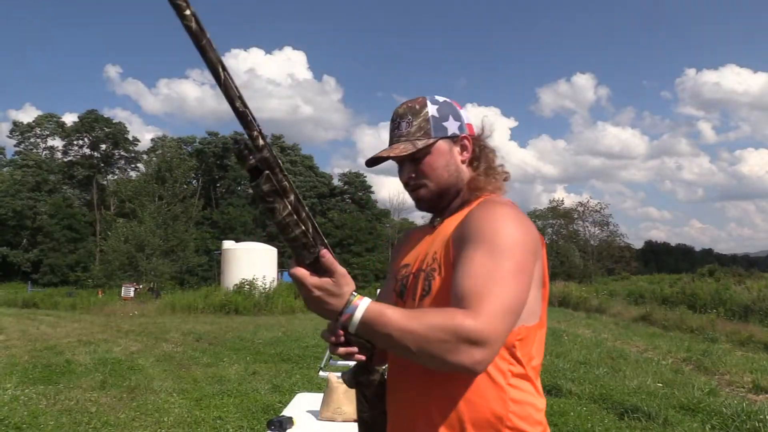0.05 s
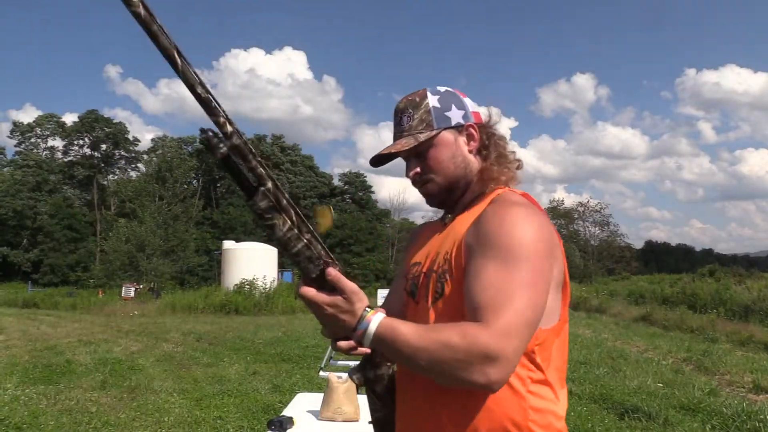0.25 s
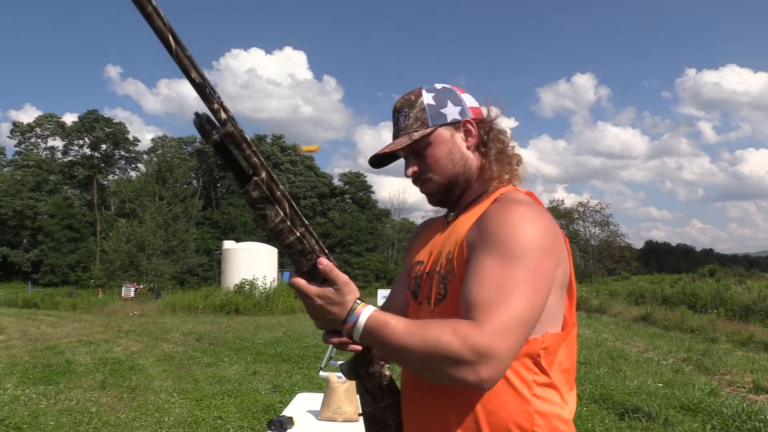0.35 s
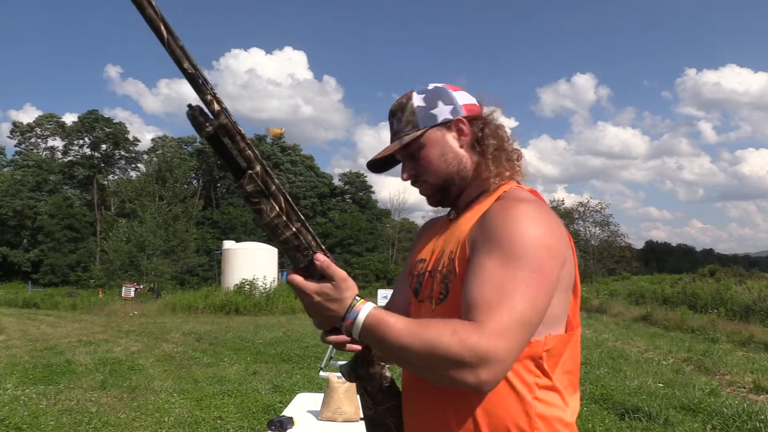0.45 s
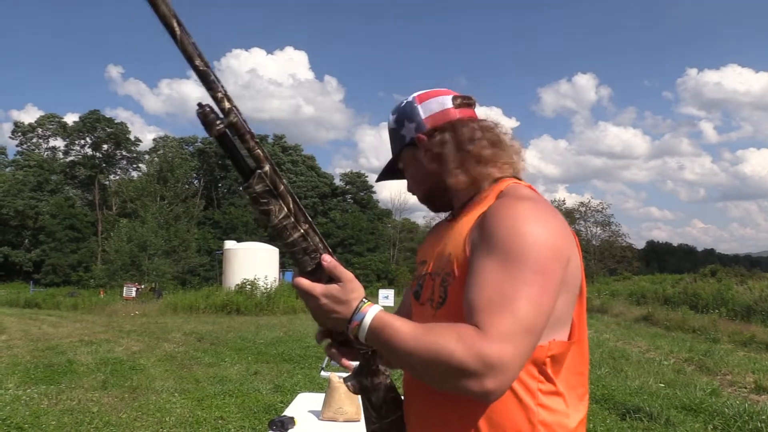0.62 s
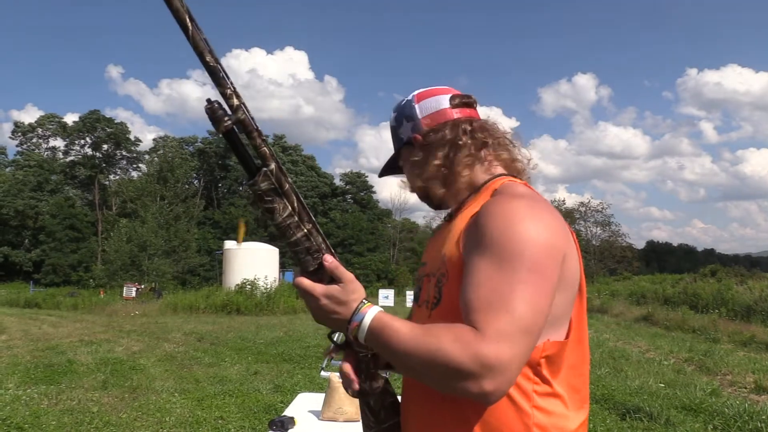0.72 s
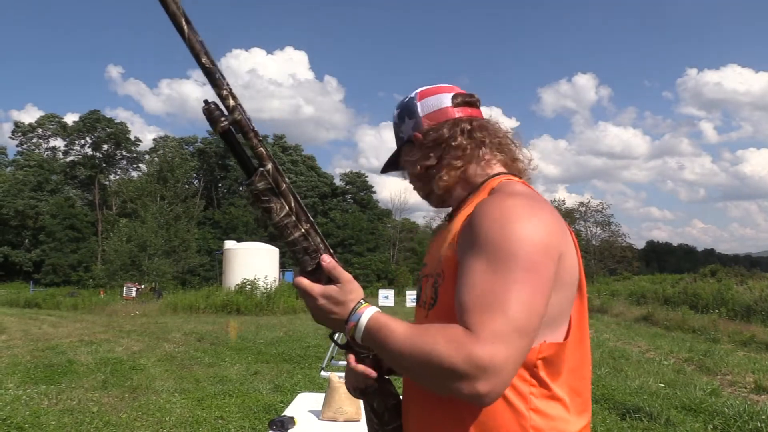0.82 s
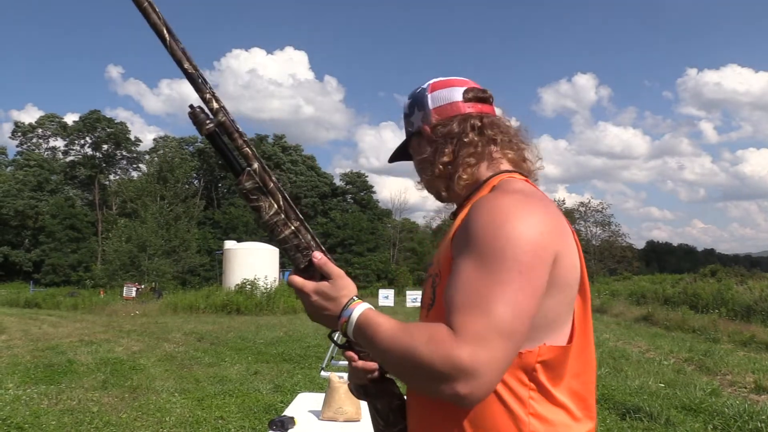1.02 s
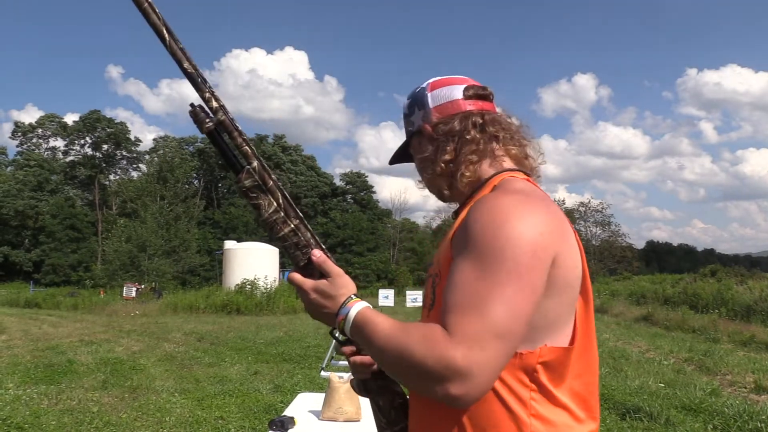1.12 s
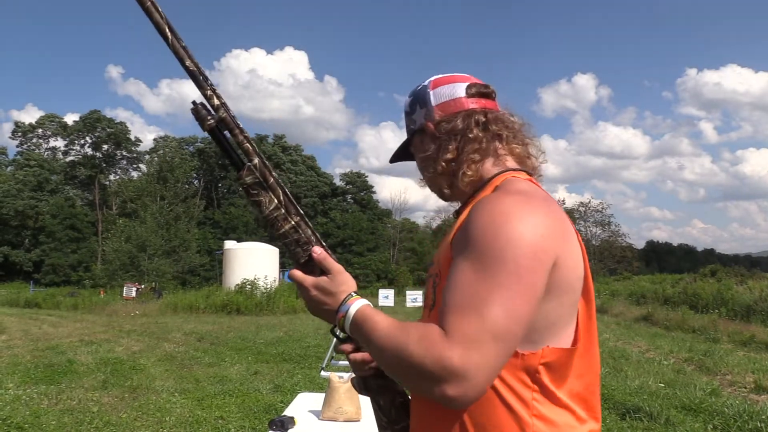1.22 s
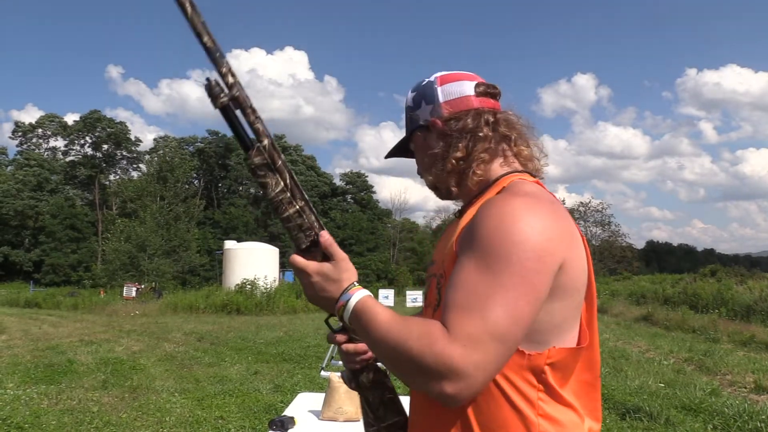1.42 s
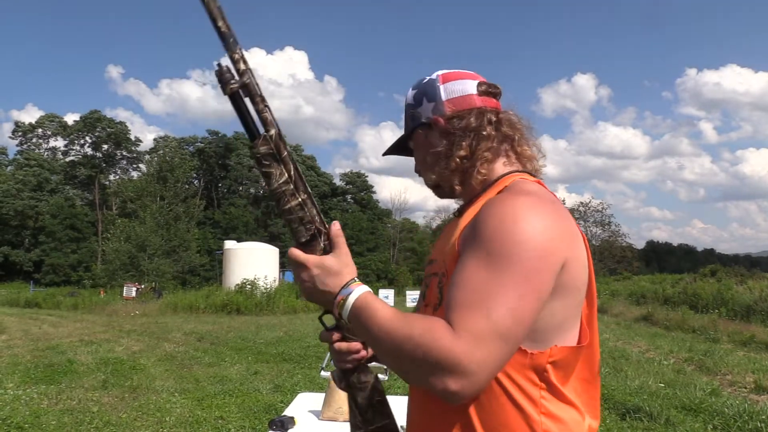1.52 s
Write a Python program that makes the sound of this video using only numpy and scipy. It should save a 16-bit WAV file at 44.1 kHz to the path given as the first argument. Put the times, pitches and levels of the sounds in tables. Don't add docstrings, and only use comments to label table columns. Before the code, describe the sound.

A shotgun's action is worked in an open field, heard from a couple of metres. Hands rustle and a catch ticks until 0.19 s; the bolt unlocks at 0.2, scrapes, and slams home at 0.25 with a bright steel clack, low thump and short outdoor tail. Loose parts click around 0.4-0.55; a shell drops faintly at 1.16, then a sleeve rubs from 1.4. Quiet air and insects lie beneath.

```python
import sys
import numpy as np
from scipy import signal
from scipy.fft import rfft, irfft
from scipy.io import wavfile
from scipy.ndimage import uniform_filter1d

SR = 44100
rng = np.random.default_rng(int(sys.argv[2]) if len(sys.argv) > 2 else 0)


def unload_audio(sound):
    columns = np.transpose(np.atleast_2d(sound))
    steps = np.round(np.clip(columns, -1, 1) * 32767)
    wavfile.write(sys.argv[1], SR, steps.astype(np.int16))


def gain_from_decibels(decibels):
    exponent = np.asarray(decibels, float) / 20
    return 10 ** exponent


N = 68355
SLAM_S = .2475


def colour(x, points):
    bins = np.fft.rfftfreq(2048, 1 / SR)
    hz, db = np.array(points, float).T
    cepstrum = irfft(np.log(gain_from_decibels(np.interp(np.log(bins + 1), np.log(hz), db))))
    cepstrum[1:1024] *= 2
    cepstrum[1025:] = 0
    impulse = irfft(np.exp(rfft(cepstrum)))
    return signal.fftconvolve(x, impulse)[:N]


def mode(x, hz, t60):
    pole = np.exp(2j * np.pi * hz / SR - np.log(1000) / (max(t60, 1e-3) * SR))
    return signal.lfilter([1], [1, -pole], x).imag


def level(x, db):
    return x * gain_from_decibels(db) / np.sqrt(np.mean(x ** 2))


def curve(rows):
    times, db = np.array(rows).T
    return gain_from_decibels(np.interp(np.arange(N) / SR, times, db))


def walk(rate):
    hold = int(SR / rate)
    steps = np.repeat(rng.standard_normal(N // hold + 1), hold)
    drift = uniform_filter1d(steps, hold)[:N]
    return drift / drift.std()


def grit(spread_db):
    size_db = spread_db * np.minimum(rng.exponential(size=N), 4)
    clicks = rng.standard_normal(N) * gain_from_decibels(size_db)
    return clicks / clicks.std()


def contacts(rows, spread=1):
    ring_cycles, roughness = 8.3, .3
    snap, ring = np.zeros(N), np.zeros(N)
    n = np.arange(1536)
    noises = rng.standard_normal((len(rows), len(n)))
    for (start_s, ring_db, chatter_s, hz, snap_db), noise in zip(rows, noises):
        chatter = SR * max(chatter_s, 1e-4)
        push = np.exp(-(n / chatter) ** 4) * (np.cos(2 * np.pi * hz * n / SR) + roughness * noise)
        tone = mode(push, hz, ring_cycles / hz)
        u = n / (SR * spread * max(chatter_s, 1e-4))
        burst = noise * np.sqrt(u + 0.02) * np.exp(-2.2 * u)
        i = int(start_s * SR)
        snap[i:i + len(n)] += gain_from_decibels(snap_db) * burst / np.sqrt(np.sum(burst ** 2))
        ring[i:i + len(n)] += gain_from_decibels(ring_db) * tone / np.abs(tone).max()
    return snap, ring


def field():
    # (frequency [Hz], level [dB])
    air_colour = [(12, -36), (20, -10.5), (208, -0.5), (308, -4), (455, -7.5), (939, -9.5), (3790, -13),
                  (7600, -21.5), (15700, -22)]
    # (frequency [Hz], gain [dB])
    field_top = [(15700, 0), (16100, -25)]
    insect_hz, insect_width_hz = 3770, 1100
    air = colour(rng.standard_normal(N), air_colour) * gain_from_decibels(.5 * walk(3.3))
    insects = mode(rng.standard_normal(N), insect_hz, 2.4 / insect_width_hz) * gain_from_decibels(1.1 * walk(5.6))
    return colour(level(air, -70.5) + level(insects, -75), field_top)


def hands():
    # (time [s], level [dB])
    rustle = [
        (0, -62),
        (.05, -69.5),
        (.19, -66),
        (.3, -71.5),
        (.5, -78.5),
        (.8, -77.5),
        (1.25, -80.5),
        (1.41, -68),
        (1.55, -66),
    ]
    # (frequency [Hz], level [dB])
    grip_colour = [(60, -3.5), (130, -2), (300, -2), (500, 4), (1150, 1), (3400, -7), (5400, -15.5),
                   (9000, -35)]
    # (frequency [Hz], level [dB])
    sleeve_colour = [(40, -6.5), (110, 6.5), (200, -9.5), (380, -0.5), (1150, -2.5), (3400, -10),
                     (5500, -11), (9000, -23.5)]
    # (time [s], level [dB])
    thumb_drag = [
        (0, -91),
        (.04, -70),
        (.11, -72.5),
        (.19, -81),
        (.2, -100),
    ]
    drag_hz, drag_t60_s, sleeve_from_s = 1620, 0.027, 1
    drag = level(mode(grit(2.5), drag_hz, drag_t60_s), 0) * curve(thumb_drag)
    rub = grit(1.5) * gain_from_decibels(1.3 * walk(57))
    grip = level(colour(rub, grip_colour), 0)
    sleeve = level(colour(rub, sleeve_colour), 0)
    rub = np.where(np.arange(N) < sleeve_from_s * SR, grip, sleeve)
    return rub * curve(rustle) + drag


def loose_parts():
    # (time [s], ring [dB], chatter [s], ring frequency [Hz], snap [dB])
    ticks = [(.0130, -62, 0.012, 533, -67.5), (.1250, -59.5, .005, 1380, -59),
             (.1370, -69, 0.0048, 1670, -69), (.1505, -55, 0.0045, 1450, -58),
             (.1715, -67, 0.013, 1400, -65), (.1868, -58, 0.0045, 3300, -46),
             (.3955, -49, 0.0022, 3460, -31.5), (.4001, -40.5, 0.0006, 3700, -32),
             (.4003, -59.5, 0.0039, 1100, -58.5), (.4010, -48, .001, 3000, -48),
             (.4006, -54.5, 0.0013, 2200, -53), (.4004, -54, .003, 1652, -49),
             (.3960, -63, 0.0016, 6753, -60), (.4062, -59, 0.0024, 3120, -47),
             (.4130, -57, 0.0036, 2860, -61), (.4669, -54, 0.0015, 3460, -38.5),
             (.4675, -64, 0.004, 1140, -60), (.4672, -65, 0.0019, 2110, -55),
             (.4795, -60, 0.0018, 2690, -47), (.4880, -62, 0.0066, 4050, -41),
             (.4990, -72, 0.0064, 3485, -57), (.5505, -62.5, .003, 1544, -52.5),
             (1.5120, -60, 0.0034, 461, -69), (1.515, -64, 0.0114, 309, -69.5)]
    # (frequency [Hz], level [dB])
    tick_colour = [(400, -30), (1100, 0), (3500, 3), (5500, -7.5), (7500, -14), (10000, -29.5),
                   (16000, -38.5)]
    snap, ring = contacts(ticks, spread=3.1)
    return ring + 2 * colour(snap, tick_colour)


def dropped_shell():
    # (time [s], ring [dB], chatter [s], ring frequency [Hz], snap [dB])
    landing = [(1.1546, -58, .0008, 8400, -58), (1.1562, -55, 0.0078, 1150, -51),
               (1.1561, -55, .0015, 1950, -47.5), (1.1578, -50.5, .0013, 7660, -43.5),
               (1.1585, -58, .0015, 11400, -43.5), (1.1580, -65, .004, 3175, -50),
               (1.1602, -57, 0.0012, 5460, -46), (1.1575, -62.5, .003, 400, -56),
               (1.1650, -64, .003, 2600, -62), (1.1640, -63, 0.0038, 731, -52),
               (1.1660, -68, .004, 7900, -56)]
    # (frequency [Hz], level [dB])
    shell_colour = [(100, -1), (500, -3), (2000, 5), (5000, 0.5), (6800, 0.5), (9000, 3.5), (11500, 1),
                    (16000, -8)]
    snap, ring = contacts(landing, spread=1.13)
    return ring + 2 * colour(snap, shell_colour)


def rail_scrape():
    # (time [s], level [dB])
    slide = [
        (.192, -83),
        (.1975, -57),
        (.2035, -52),
        (.206, -27.5),
        (.220, -36.5),
        (.238, -34.5),
        (.248, -19),
        (.260, -31.5),
        (.275, -52.5),
    ]
    fade_db_s = 295.5
    fade_end = (.575, slide[-1][1] - 0.26 * fade_db_s)
    return grit(3) * curve(list(slide) + [fade_end]) * gain_from_decibels(0.9 * walk(300))


def struck_steel(force, ring):
    # (frequency [Hz], level [dB], t60 [s])
    open_modes = [(500, -22, .03), (905, -24.5, .02), (1341, -29, .02), (1770, -15.5, .02),
                  (2250, -18.5, 0.032), (2620, -13.5, .025), (3040, -19, .02), (3300, -18.5, .02),
                  (3810, -17.5, 0.033), (4740, -27, 0.012)]
    # (frequency [Hz], level [dB], t60 [s])
    shut_modes = [(533, -33, .025), (645, -28, 0.027), (902.4, -34, 0.011), (1105, -28.5, 0.018),
                  (1400, -22, .035), (1670, -14.5, 0.018), (2263, -23, .03), (2650, -22.5, 0.025),
                  (2870, -19, .02), (3390, -18.5, .033), (3610, -16.5, .035), (4024, -19.5, 0.02995),
                  (4290, -21.5, .03), (5056, -25, .03)]
    closing_s, radiate_hz, body_db = .2385, 620, -10.5
    shut = np.arange(N) > closing_s * SR
    body = np.zeros(N)
    for modes, gate in ((open_modes, ~shut), (shut_modes, shut)):
        for hz, db, t60 in modes:
            body += gain_from_decibels(db) * mode(force * gate, hz, t60)
    high_pass = signal.butter(2, radiate_hz, "high", fs=SR)
    return signal.lfilter(*high_pass, ring + gain_from_decibels(body_db) * body)


def lingering_rings(after):
    # (frequency [Hz], rms level [dB], t60 [s], width [Hz])
    clusters = [(345, -61, .21, 110), (594, -59, .45, 96), (800, -59.5, 0.43, 98), (1299, -64.5, .34, 300),
                (3700, -63, .56, 350), (4140, -57.5, .8, 300.2), (4594, -58, .35, 330),
                (5200, -57, .22, 300), (6500, -59, .18, 900)]
    # (frequency [Hz], peak level [dB], t60 [s])
    tube = [(253, -51.5, 0.32), (538, -61.5, .4), (1335, -49.5, .25), (1860, -58, .16)]
    rise_s, shimmer_hz, shimmer_db, shimmer_t60_s = 0.0046, 5500, -43.5, 0.16
    rings = np.zeros(N)
    for hz, db, t60, width in clusters:
        rings += level(mode(rng.standard_normal(N), hz, 3.5 / width), db) * gain_from_decibels(-60 * after / t60)
    for hz, db, t60 in tube:
        rings += gain_from_decibels(db - 60 * after / t60) * np.sin(2 * np.pi * hz * after)
    rings *= 1 - np.exp(-after / rise_s)
    shimmer = signal.lfilter(*signal.butter(2, shimmer_hz, "high", fs=SR), rng.standard_normal(N))
    return rings + shimmer * gain_from_decibels(shimmer_db - 60 * after / shimmer_t60_s) * (after > 0)


def stock_thump(after):
    cycles = after * 190.8
    envelope = np.exp(-cycles / 0.692) * (1 - np.exp(-cycles / .12))
    return gain_from_decibels(-35) * np.sin(2 * np.pi * cycles) * envelope


def action():
    # (time [s], ring [dB], chatter [s], ring frequency [Hz], snap [dB])
    blows = [(.2027, -38.5, 0.0006, 2360, -42.5), (.2039, -23.5, 0.000725, 1770, -30),
             (.2048, -20.5, 0.00081, 3700, -20), (.2050, -30, .002, 1770, -19),
             (.2042, -32, .003, 800, -39.5), (.2060, -38, 0.0041, 520, -44),
             (.2058, -22, 0.00088, 3040, -26), (.2055, -27, .004, 2620, -36),
             (.2096, -19.5, 0.00026, 3300, -28), (.2165, -33, 0.0019, 3840, -39),
             (.2213, -30.5, 0.00052, 4120, -27), (.2218, -28, .0004, 4300, -23),
             (.2224, -25, 0.0011, 3950, -17), (.2230, -27, .0006, 2200, -27),
             (.2238, -30, .0015, 3050, -32), (.2403, -22.5, 0.0015, 3930, -27.5),
             (.2411, -16.5, .001, 3940, -29), (.2428, -21, 0.00099, 3800, -22.5),
             (.2450, -18.5, .0003, 3559, -25), (.2440, -30, .006, 1105, -30),
             (.2474, -22, .0012, 3988, -14), (.2479, -8, .002, 4000, -17),
             (.2486, -21.5, 0.0042, 1671, -26), (.2470, -37, 0.0041, 650, -44),
             (.2490, -23, .003, 2270, -24.5), (.2495, -24.5, .003, 2870, -24),
             (.2507, -16, .0012, 4070, -17), (.2529, -15.5, .0003, 3300, -25),
             (.2543, -24, .001, 3400, -24), (.2550, -28, .003, 1647, -30), (.2562, -25, .001, 3440, -30.5),
             (.2588, -21.5, .0005, 3200, -31), (.2605, -31.5, 0.0027, 2960, -36.5),
             (.2640, -32.5, .0011, 3700, -35), (.2662, -37.5, .001, 3567, -44),
             (.2700, -39.5, .002, 4150, -41.5)]
    # (frequency [Hz], level [dB])
    blow_colour = [(100, -40.5), (400, -18), (1000, -13.5), (2500, 3), (6000, 6.5), (9000, 2.5),
                   (13500, 1.5), (16500, -12.5)]
    # (frequency [Hz], level [dB])
    scrape_colour = [(200, -29), (500, -4.5), (1800, -3.5), (3800, 2.5), (6500, -1), (8000, -11.5),
                     (12000, -13), (16000, -19)]
    snap, ring = contacts(blows)
    scrape = rail_scrape()
    steel = struck_steel(snap + 0.45 * scrape, ring)
    after = np.maximum(np.arange(N) / SR - SLAM_S, 0)
    bare = colour(2 * snap, blow_colour) + colour(scrape, scrape_colour)
    return steel + bare + lingering_rings(after) + stock_thump(after)


def scattered_return(gun):
    t60_s, rise_s, top_hz = 0.44, 0.0073, 4500
    t = np.arange(SR // 2) / SR
    tail = rng.standard_normal(len(t)) * gain_from_decibels(-60 * t / t60_s) * np.minimum(t / rise_s, 1)
    echo = signal.fftconvolve(gun, tail)[:N]
    return gain_from_decibels(-38.5) * signal.lfilter(*signal.butter(1, top_hz, fs=SR), echo) / 20


def scene():
    gun = action()
    mix = field() + hands() + loose_parts() + dropped_shell() + scattered_return(gun) + gun
    return mix[None]


def low_pass(x):
    return signal.sosfilt(signal.butter(12, 16970, fs=SR, output="sos"), x)


def record(dry):
    top_cut = signal.ellip(10, .2, 70, 16600, fs=SR, output="sos")
    mix = signal.sosfilt(top_cut, dry)
    return low_pass(mix)


dry = scene()
out = record(dry)
unload_audio(out)
```